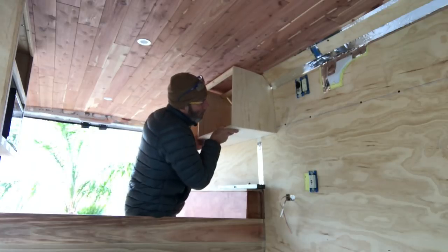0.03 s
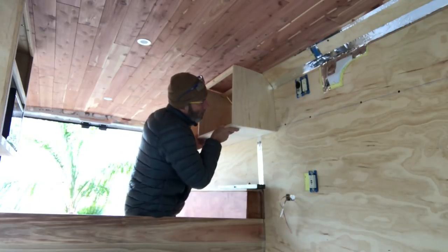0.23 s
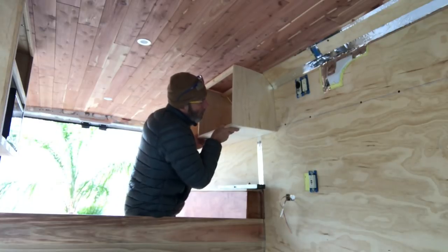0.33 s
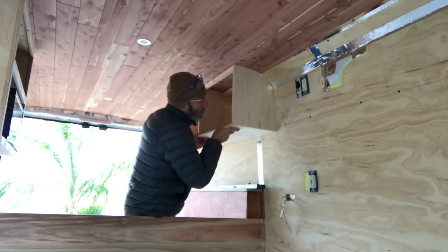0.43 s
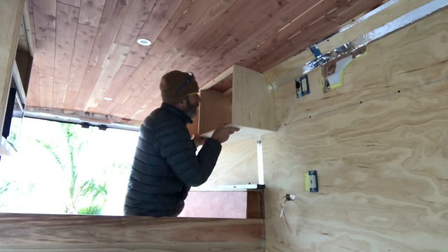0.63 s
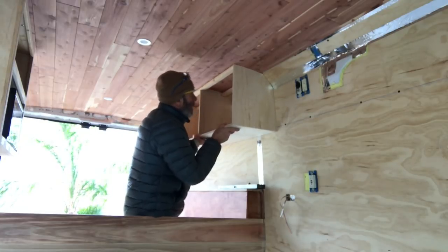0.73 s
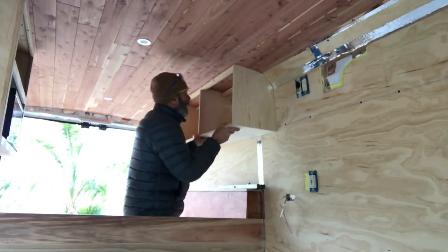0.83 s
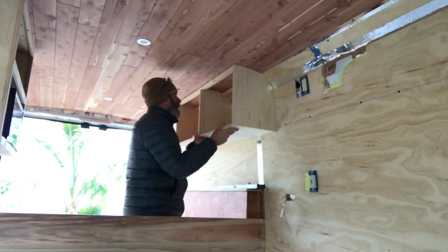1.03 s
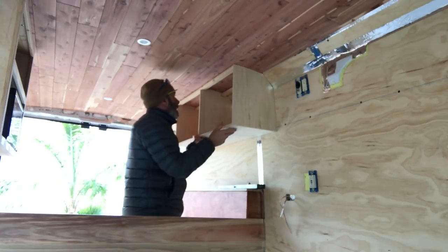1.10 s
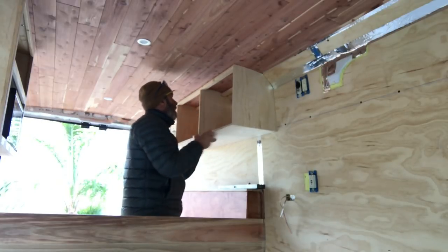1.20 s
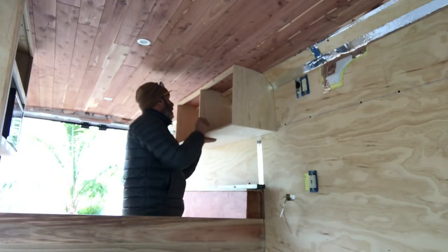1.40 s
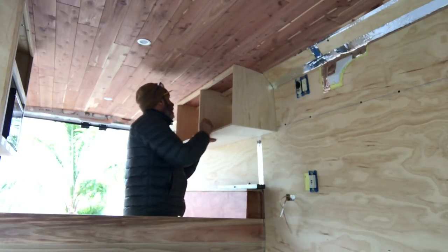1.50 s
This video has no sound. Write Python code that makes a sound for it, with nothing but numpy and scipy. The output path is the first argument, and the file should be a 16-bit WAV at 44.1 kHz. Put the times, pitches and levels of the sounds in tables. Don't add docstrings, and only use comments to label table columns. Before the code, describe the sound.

Two short, low, hollow wood knocks, each a cluster of quick bounces, with brief scrapes and creaky rubs around them, then mostly soft cloth rustle, faint nudges, low outdoor rumble and hiss in a small dry wooden room.

```python
import sys
import numpy as np
from scipy import signal
from scipy.fft import rfft, irfft, next_fast_len
from scipy.io import wavfile
from scipy.ndimage import uniform_filter1d, map_coordinates

SR = 44100
rng = np.random.default_rng(int(sys.argv[2]) if len(sys.argv) > 2 else 0)


def wav_out(sig):
    wavfile.write(sys.argv[1], SR, np.round(np.clip(np.atleast_2d(sig).T, -1, 1) * 32767).astype(np.int16))


def volts_from_db(level):
    exponent = np.asarray(level, float) / 20
    return 10 ** exponent


N = 68355

EDGE_HZ = [66, 108, 167, 245, 340, 432, 545, 665, 850, 945, 1118, 1390, 1572]
# level/dB, t60/s
EDGE_RING = [(-19.5, 0.45), (-6, 0.08), (-11.5, .1), (5, 0.056), (-9.5, 0.088), (-15.5, 0.1),
             (-12.5, 0.037), (-12, 0.09), (-9.5, 0.026), (-12, .04), (-18, 0.13), (-32, 0.067), (-23, 0.1)]
BACK_HZ = [70, 120, 185, 250, 310, 398, 568, 711, 857, 1015, 1135, 1278, 1432, 1567]
# level/dB, t60/s
BACK_RING = [(-3.5, 0.42), (-4, 0.059), (-3.5, .13), (2, 0.12), (-6, 0.027), (-13, 0.055), (-7.5, 0.078),
             (-20, 0.083), (-14.5, .07), (-16.5, 0.11), (-11, 0.11), (-13, 0.11), (-34.5, 0.11),
             (-32, 0.13)]
# t/s, level/dB, contact/ms
EDGE_BLOWS = [(.012, -45.5, 1.3), (.036, -43, 2.24), (.047, -48.5, 1.5), (.2275, -31, 1),
              (.2318, -20.5, 1.95), (.2445, -23.5, 1.47), (.256, -28.5, 0.6), (.284, -39, 1.86),
              (.328, -48.5, 1.9), (1.365, -51.5, 2.4), (1.384, -50.5, 2.3)]
# t/s, level/dB, contact/ms
BACK_BLOWS = [
    (.469, -44, 0.14),
    (.4722, -18, 2.3),
    (.4805, -23.5, 0.8),
    (.4962, -26, 1.4),
    (.519, -38, 1.8),
    (.534, -34.5, 1.2),
    (.606, -44.5, 2.2),
]
# t/s, swell/s, fade/s, level/dB, brightest f/Hz
DRAGS = [(-.03, 0.027, 0.074, -54, 1770), (.16, 0.062, 0.044, -50.5, 1550), (.228, 0.019, 0.027, -49, 1790),
         (0.397, 0.061, 0.022, -49, 1570), (0.467, 0.0045, 0.056, -48.5, 1190),
         (0.582, 0.026, 0.045, -51, 3900), (.95, 0.037, .025, -57.5, 2500),
         (1.02, 0.025, 0.034, -57.5, 3000), (1.131, 0.033, .03, -57.5, 1490),
         (1.25, 0.032, 0.016, -56.5, 1300), (1.357, 0.019, 0.037, -51.5, 2630),
         (1.444, 0.02, 0.097, -57.5, 8100), (1.51, 0.029, .04, -58.5, 7500)]
# t/s, swell/s, fade/s, level/dB, panel f/Hz
HUMS = [(-.021, 0.03, 0.059, -50.5, 265), (0.2, 0.025, 0.028, -46.5, 272), (.184, .021, 0.025, -41.5, 314),
        (0.21, 0.017, .016, -52, 762), (.2245, 0.0034, .011, -40, 930), (.229, 0.011, 0.036, -41, 685),
        (.466, 0.0081, .026, -45, 1170), (.421, 0.043, 0.023, -51.5, 111), (.444, 0.015, .014, -60, 1012),
        (1, .016, .026, -66, 2100), (1.345, .012, 0.038, -50.5, 260), (.47, 0.014, 0.033, -36, 558),
        (.478, 0.026, .014, -50.5, 840), (.228, 0.015, 0.025, -43, 562), (.52, 0.015, .035, -44, 185),
        (.5205, 0.022, 0.025, -50.5, 400)]
# t/s, swell/s, fade/s, level/dB, frame f/Hz
SHUDDERS = [
    (.236, .026, .03, -44, 46),
    (.291, 0.037, .06, -51, 62),
    (.511, 0.039, .034, -47, 43),
    (.586, .03, 0.037, -48, 42.6),
    (.55, 0.032, .03, -47, 94.6),
    (1.091, 0.032, 0.027, -56.5, 50.3),
    (1.356, 0.029, .034, -54, 56.6),
    (1.421, 0.031, 0.02, -52, 46),
    (1.511, 0.028, .03, -56, 50.7),
]
# f/Hz, t60/s
CABIN_DECAY = [(100, 0.32), (500, 0.14), (3000, 0.19)]
# t/s, level/dB
JACKET_MOVES = [(0, -56.5), (.08, -62), (.39, -61), (.44, -58), (.5, -63.5), (.57, -58), (.62, -57.5),
                (.82, -58), (.86, -57.5), (1.0, -57), (1.12, -59), (1.16, -58.5), (1.25, -59.5),
                (1.34, -59.5), (1.42, -58), (1.55, -64)]
# f/Hz, level/dB
CLOTH_COLOUR = [(90, -17), (160, -3), (400, -3.5), (900, -3.5), (3200, -10.5), (6500, -13.5), (9000, -19),
                (15500, -24.5)]
# f/Hz, level/dB
RUMBLE_COLOUR = [(12, -49), (20, -4.5), (52, -1.5), (81, -2.5), (117, -9), (150, -11.5), (300, -18),
                 (390, -21.5), (660, -120)]
# f/Hz, level/dB
HISS_COLOUR = [(200, 0), (500, -9.5), (1500, -9.5), (6500, -15.5), (9000, -28), (15500, -40)]

# (t/s, loss/dB)
EDGE_SETTLES, BACK_SETTLES = (0.24, 11), (0.506, 13.6)
SETTLING_S = 0.0054
PANEL_HZ = 140
RADIATES_HZ = 71.4


def unit(x):
    return x / np.sqrt(np.mean(x ** 2) + 1e-20)


def along(points, hz):
    f, value = np.transpose(points)
    return np.interp(np.log(hz + 1), np.log(f + 1), value)


def wobble(rate):
    knots = rng.standard_normal(int(N * rate / SR) + 4)
    return map_coordinates(knots, [np.arange(N) * rate / SR])


def filtered(x, response):
    m = next_fast_len(N + 8192)
    return irfft(rfft(x, m) * response(np.fft.rfftfreq(m, 1 / SR)), m)[:N]


def rush(colour, patchy_db):
    z = signal.stft(rng.standard_normal(N), nperseg=512)[2]
    patches = uniform_filter1d(rng.standard_normal(z.shape), 8, 0)
    patches = uniform_filter1d(patches, 6, 1)
    x = signal.istft(z * volts_from_db(patchy_db * unit(patches)), nperseg=512)[1][:N]
    return unit(filtered(x, lambda hz: volts_from_db(along(colour, hz))))


def swell_fade(start, swell, fade):
    t = np.arange(N) / SR - start
    ramp = np.minimum(t / swell, 1 - (t - swell) / fade)
    return np.sin(np.pi / 2 * np.clip(ramp, 0, 1)) ** 2


def ringing(hzs, rings, low):
    t = np.arange(SR // 2) / SR
    response = np.zeros(len(t))
    for hz, (db, t60) in zip(hzs, rings):
        if (hz < PANEL_HZ) == low:
            response += volts_from_db(db - 60 * t / t60) * np.sin(2 * np.pi * hz * t)
    return response


def knocks(blows, hzs, rings, settles):
    settle_s, loss_db = settles
    t = np.arange(N) / SR
    force = np.zeros((2, N))
    for start, db, ms in blows:
        push = np.sin(np.pi * np.clip((t - start) / (ms / 1000), 0, 1)) ** 2
        force[int(start > settle_s)] -= volts_from_db(db) * push / push.sum()
    panels = signal.fftconvolve(force, ringing(hzs, rings, False)[None], axes=1)[:, :N]
    wall = signal.fftconvolve(force.sum(0), ringing(hzs, rings, True))[:N]
    muffling = volts_from_db(-loss_db * np.clip((t - settle_s) / SETTLING_S, 0, 1))
    x = panels[0] * muffling + panels[1] + wall
    return filtered(x, lambda hz: (1j * hz / (RADIATES_HZ + 1j * hz)) ** 2)


def drags():
    peak_db, width_octaves = 13.5, 1.58
    grain_db, grains_per_s = 1.5, 900
    grit = np.zeros(N)
    for start, swell, fade, db, peak_hz in DRAGS:
        noise = rng.standard_normal(N) * volts_from_db(grain_db * wobble(grains_per_s))

        def colour(hz):
            bump = np.exp(-(np.log2((hz + 1) / peak_hz) / width_octaves) ** 2)
            return volts_from_db(peak_db * bump + along(CLOTH_COLOUR, hz)) * (hz > 300)

        grit += volts_from_db(db) * swell_fade(start, swell, fade) * unit(filtered(noise, colour))
    return grit


def hums():
    q = 4.3
    hum = np.zeros(N)
    for start, swell, fade, db, hz in HUMS + SHUDDERS:

        def resonance(f):
            damping = 1j * f * hz / q
            return (damping / (hz * hz - f * f + damping)) ** 2

        shape = swell_fade(start, swell, fade)
        x = shape * filtered(rng.standard_normal(N), resonance)
        hum += volts_from_db(db) * x * np.linalg.norm(shape) / np.linalg.norm(x)
    return hum


def cabin(x):
    hz, t, z = signal.stft(rng.standard_normal(SR // 2), SR, nperseg=256)
    decay = volts_from_db(-60 * t / along(CABIN_DECAY, hz)[:, None])
    tail = signal.istft(z * decay, SR, nperseg=256)[1]
    delayed = np.pad(x, (300, 0))
    return signal.fftconvolve(delayed, tail / np.linalg.norm(tail))[:N]


def jacket():
    start, db = np.transpose(JACKET_MOVES)
    moves_db = np.interp(np.arange(N) / SR, start, db)
    flutter_db = 0.5 * wobble(16) + 0.7 * wobble(45)
    return volts_from_db(moves_db + flutter_db + 3) * rush(CLOTH_COLOUR, patchy_db=1.57)


def outdoors():
    lumps_db = 1.5 * wobble(14)
    return volts_from_db(-58 + lumps_db) * rush(RUMBLE_COLOUR, patchy_db=0.9)


def hiss():
    return volts_from_db(-64) * rush(HISS_COLOUR, patchy_db=1.0)


def scene():
    box = knocks(EDGE_BLOWS, EDGE_HZ, EDGE_RING, EDGE_SETTLES)
    box += knocks(BACK_BLOWS, BACK_HZ, BACK_RING, BACK_SETTLES)
    box += drags() + hums()
    reverb_db = -15
    return (box + volts_from_db(reverb_db) * cabin(box) + jacket() + outdoors())[None]


def roll_off(x):
    return signal.sosfilt(signal.butter(12, 15610, fs=SR, output="sos"), x)


def record(dry):
    notch_hz, notch_wide_hz, notch_db, top_hz = 10380, 500, 3, 15610

    def microphone(hz):
        dip = np.exp(-((hz - notch_hz) / notch_wide_hz) ** 2)
        return volts_from_db(-notch_db * dip) * (hz < top_hz)

    mix = filtered(dry[0] + hiss(), microphone)
    return roll_off(mix[None])


dry = scene()
out = record(dry)
wav_out(out)
```